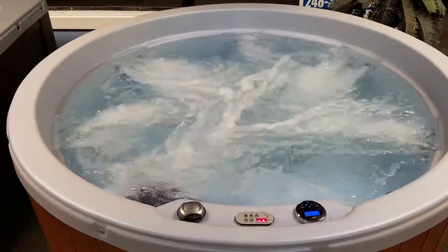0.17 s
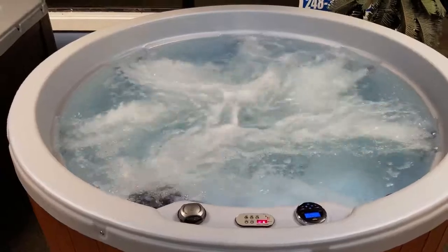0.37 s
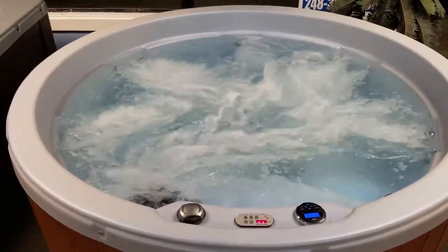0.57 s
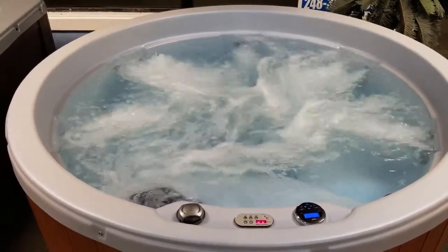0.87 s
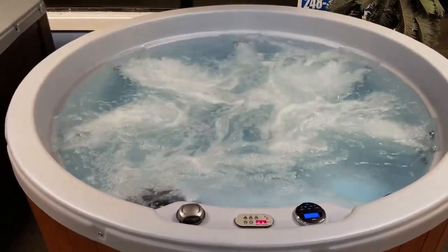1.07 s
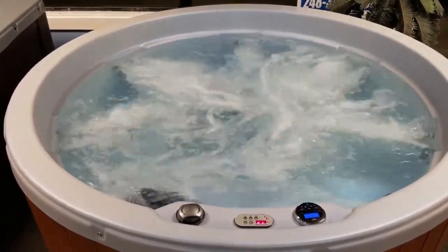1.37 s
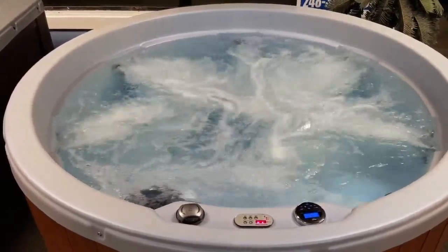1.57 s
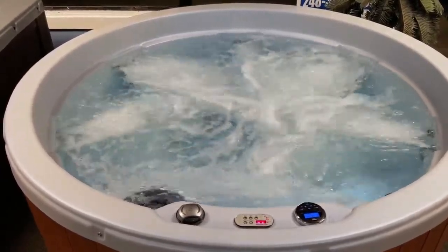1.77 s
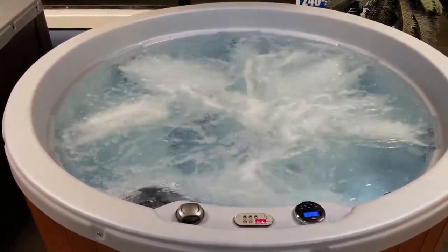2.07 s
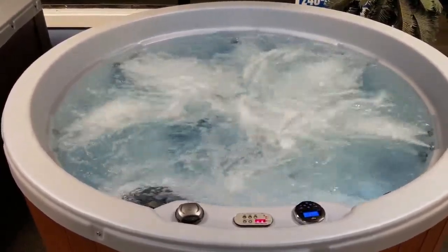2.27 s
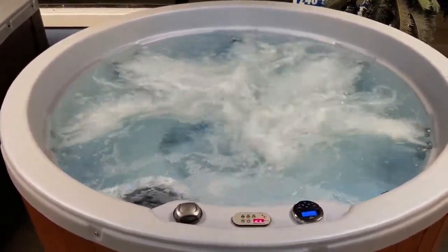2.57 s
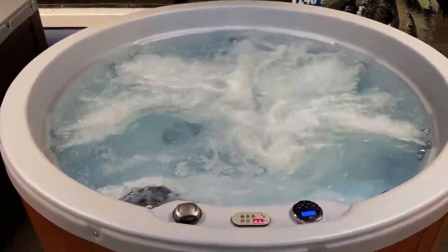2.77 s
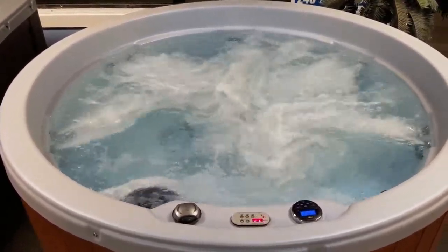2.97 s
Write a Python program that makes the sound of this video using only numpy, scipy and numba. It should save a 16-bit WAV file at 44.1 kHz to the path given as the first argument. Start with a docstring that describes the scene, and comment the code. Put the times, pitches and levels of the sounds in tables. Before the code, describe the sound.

Running hot tub rumbles and gurgles continuously, with fizzing spray and a faint pump hum

```python
"""Running hot tub, heard from the rim

A hot tub runs in a showroom, heard by a small two-port microphone; the sound fades in. Jets drive clouds of
large bubbles that drone in the shell: gliding sines blended with flickering noise. Froth and spray are made
the same way from smaller bubbles, and a few larger bubbles pop out of the wash. Air hisses into two intakes
as coloured noise with delayed copies off the tub walls, and the pump motor hums on wavering sines."""
import sys
import numpy as np
from scipy import signal
from scipy.fft import rfft, irfft
from scipy.io import wavfile
from scipy.ndimage import uniform_filter1d
from numba import njit

SR = 44100
rng = np.random.default_rng(int(sys.argv[2]) if len(sys.argv) > 2 else 0)


def wav_out(sig):
    """Save sig, one row per channel (or a flat mono array), as 16-bit PCM at SR to the path in sys.argv[1]."""
    wavfile.write(sys.argv[1], SR, np.round(np.clip(np.atleast_2d(sig).T, -1, 1) * 32767).astype(np.int16))


def gain_from_db(level_db):
    """Turn a decibel level (scalar or array-like) into a linear amplitude factor."""
    decades = np.asarray(level_db, float) / 20
    return 10 ** decades


N = 138033  # length in samples

HZ = np.arange(N // 2 + 1) * SR / N + 1e-3  # spectrum frequencies, kept above zero for the logarithm
BANDS = 40 * 2 ** np.arange(0, 9.5, .5)  # centres of the half-octave noise bands, Hz


def gain(table, col=1):
    """Gain at each spectrum frequency, drawn through (Hz, dB) points on a log frequency axis."""
    points = np.array(table, float)
    return gain_from_db(np.interp(np.log(HZ), np.log(points[:, 0]), points[:, col]))


def unit(x):
    """Scale to rms 1."""
    return x / np.sqrt(np.mean(x ** 2))


def curve(table):
    """Gain over time, drawn through (s, dB) points."""
    points = np.array(table, float)
    return gain_from_db(np.interp(np.arange(N) / SR, points[:, 0], points[:, 1]))


def walk(rate):
    """Slow random drift: levels held for 1 / rate seconds, smoothed twice; spread near 1."""
    hold = int(SR / rate)
    steps = np.repeat(rng.standard_normal(N // hold + 1), hold)
    smooth = uniform_filter1d(uniform_filter1d(steps, hold), hold)
    return smooth[:N] * 4 / 3  # makes up for the spread lost in smoothing


@njit
def ring(start, hz, cycles, left, right, lag, glide, rise, n):
    """Each bubble is a swelling, dying sine that rises in pitch; it sounds lag samples later on the right."""
    lead = 100  # spare samples ahead, for negative lags
    out = np.zeros((2, n + 8000))
    for k in range(len(start)):
        span = min(int(cycles[k] * SR / hz[k]), 7000)
        phase = 0.
        first = int(start[k]) + lead
        for i in range(span):
            phase += 2 * np.pi * hz[k] * (1 + glide * i / span) / SR
            swell = min(1., i / (rise * span))
            v = np.sin(phase) * np.exp(-5. * i / span) * swell
            out[0, first + i] += left[k] * v
            out[1, first + i + int(lag[k])] += right[k] * v
    return out[:, lead:n + lead]


def swarm(per_s, lo_hz, hi_hz, cycles, spread_db, lag_ms, glide, bunch_db):
    """Random bubbles all over the tub, in bunches; mean spectrum flat at the level of unit noise."""
    largest_db, rise = 9, .08  # cap on the random level; swell as a share of the bubble's life
    when, pitch, strength, side = rng.random((int(per_s * N / SR), 4)).T
    hz = lo_hz * (hi_hz / lo_hz) ** pitch
    start = when * (N - 1)
    level_db = np.minimum(-spread_db * np.log(strength + 1e-9), largest_db)
    bunch = bunch_db * walk(9.1)[start.astype(int)]
    size = hz * gain_from_db(level_db + bunch)  # the factor hz evens out the spectrum
    lag = (2 * side - 1) * lag_ms * SR / 1000
    bubbles = ring(start, hz, cycles + 0 * hz, size, size, lag, glide, rise, N)
    return unit(bubbles) * np.sqrt(2 * (hi_hz - lo_hz) / SR)


def spread(flicker_db, rate, bands):
    """Noise in half-octave bands that flicker independently; nearly alike left and right in the bass only."""
    side_db, alike_hz = -20.5, 1500  # side level in the bass; side grows to full near this frequency
    out = 0
    side = np.clip(gain_from_db(side_db) + (HZ / alike_hz) ** 2, 0, 1)
    for hz in bands:
        band = np.cos(np.pi * np.clip(np.log2(HZ / hz), -.5, .5))
        noise = np.exp(2j * np.pi * rng.random((2, len(HZ))))  # random phases
        m, s = noise * band / np.sqrt(1 + side ** 2)
        stereo = irfft(np.array([m + side * s, m - side * s]), N)
        out = out + gain_from_db(flicker_db * walk(rate)) * stereo
    return out * np.sqrt(N)


def mix(noise, grains, share, table):
    """Blend noise and bubbles by their share of the power, colour them and scale to rms 1."""
    blend = np.sqrt(1 - share) * noise + np.sqrt(share) * grains
    return unit(irfft(rfft(blend) * gain(table), N))


def pump():
    """Mains-driven hum of the motor: a few sines that waver in level and phase."""
    # Each row: frequency in Hz, rms level in dB, wander of the level in dB.
    hum_lines = [(120, -41.5, 1.2), (240, -52, 2.), (1320, -65, 2.)]
    waver = .5  # radians
    t = np.arange(N) / SR
    out = 0
    for hz, db, wander_db in hum_lines:
        level = np.sqrt(2) * gain_from_db(db + wander_db * walk(7.92))
        phase = 2 * np.pi * (hz * t + rng.random()) + waver * walk(9.13)
        out = out + level * np.sin(phase)
    return out


def spray():
    """Countless droplets, as very short high sines, fizz over an even treble rush."""
    # Colour of the fine spray all around. Each row: frequency in Hz, relative level in dB per Hz.
    spray_colour = [(1500, -20), (2500, 0), (3400, -1.5), (4000, 0), (5000, -1), (5400, -4), (6400, -5),
                    (7000, -8), (8000, -5), (9200, -4), (9450, -13), (10050, -13), (10250, -3), (11200, -4),
                    (11700, -8), (13300, -8), (14000, -2), (16000, -3)]
    drops = swarm(per_s=5000, lo_hz=2200, hi_hz=5500, cycles=3.9, spread_db=2.5, lag_ms=.36,
                  glide=.2, bunch_db=2.5)
    rush = spread(flicker_db=0.91, rate=9.96, bands=BANDS[9:])
    return mix(rush, drops, 0.19, spray_colour) * gain_from_db(-38)


def hiss():
    """Air sucked into two intakes: flickering noise, heard directly and as delayed copies off the tub walls."""
    # Colours of the duller and the brighter intake. Each row: frequency in Hz, relative level in dB per Hz.
    dull_colour = [(4000, -30), (5200, -7), (5800, -1), (6400, -4), (6900, 0), (7400, -1), (9200, -4),
                   (9500, -25)]
    bright_colour = [(9000, -25), (9400, -1), (10050, 0), (10250, -7), (11100, -7), (11600, 0), (13300, 0),
                     (13900, -8), (15000, -25)]
    # Paths from each intake. Each row: left delay in ms, left gain as a factor, right delay in ms,
    # right gain as a factor; a minus sign turns the wave over.
    dull_paths = [(0., 1., -.045, 1.), (1.156, .2, 1.115, .3), (3.064, .4, 2.283, .25),
                  (4.212, .2, 3.751, .55), (5.828, .2, 4.855, .2)]
    bright_paths = [(0., 1., .153, 1.), (1.13, .3, 1.281, .3), (3.974, .4, 2.965, .25),
                    (4.368, .3, 4.167, -.4), (5.45, -.25, 4.47, .25)]

    def late(ms):
        """A delay, as a phase turn of the spectrum."""
        return np.exp(-2j * np.pi * HZ * ms / 1000)

    out = 0
    for colour, paths in ((dull_colour, dull_paths), (bright_colour, bright_paths)):
        air = rfft(rng.standard_normal(N) * gain_from_db(.5 * walk(14))) * gain(colour)
        for left_ms, left, right_ms, right in paths:
            out = out + air * np.array([left * late(left_ms), right * late(right_ms)])
    return unit(irfft(out, N)) * gain_from_db(-41.5)


def froth():
    """Small bubbles burst all over the surface, as short gliding sines above a wash of water noise."""
    # Colour of the surface froth. Each row: frequency in Hz, relative level in dB per Hz.
    froth_colour = [(300, -42), (550, -12), (1000, -6), (1130, -3), (1500, -3), (1950, 1.5), (2070, 4.5),
                    (2200, 0), (3000, -9.5), (5000, -57)]
    # Rise and fall of the froth. Each row: time in seconds, level in dB.
    froth_level = [(.4, -44), (.7, -42), (1., -41.5), (1.25, -44), (1.45, -39), (1.65, -43.5), (2.42, -44),
                   (2.48, -38), (2.52, -43), (2.65, -40.5), (2.8, -42.5), (3.1, -41)]
    bubbles = swarm(per_s=1800, lo_hz=658, hi_hz=3990, cycles=13.2, spread_db=2.5, lag_ms=0.37,
                    glide=0.19, bunch_db=0.67)
    wash = spread(flicker_db=0.52, rate=11.0, bands=BANDS[5:16])
    return mix(wash, bubbles, 0.5, froth_colour) * curve(froth_level)


def pops():
    """A few larger bubbles stand out, most off to one side; each rings as a rising, dying sine."""
    # Each row: start in seconds, level in dB ahead of swell and decay, starting pitch in Hz,
    # left over right in dB.
    pop_list = [(0.47, -23, 920, 3), (0.693, -26, 1300, -5), (1.437, -28, 1500, -3), (1.46, -33, 1900, -2),
                (1.54, -24, 1700, -9), (2.44, -38, 2100, -12), (2.471, -25, 1990, -4),
                (2.486, -33, 1960, -1), (2.497, -35, 1300, 3), (2.537, -24, 1310, -10),
                (2.555, -22.5, 1200, 1), (2.575, -35, 2300, 0), (2.608, -25, 1300, -7),
                (2.621, -13, 1020, 1), (2.6255, -20, 1420, 0), (2.636, -35, 2700, 0), (2.66, -31, 1390, -6),
                (2.68, -39, 2050, 3), (2.712, -30, 1350, 2), (2.724, -23, 1350, -4)]
    cycles, lag_ms = 11., .27  # life in cycles of the starting pitch; delay on the right
    t, db, hz, pan = np.array(pop_list, float).T
    left, right = gain_from_db(db + pan / 2), gain_from_db(db - pan / 2)
    lag = lag_ms * SR / 1000 + 0 * t
    return ring(t * SR, hz, cycles + 0 * t, left, right, lag, .4, .2, N)  # glide, swell share of life


def churn():
    """Large bubble clouds from the jets drone in the tub shell: low gliding sines in flickering noise."""
    # Colour of the clouds through the shell. Each row: frequency in Hz, relative level in dB per Hz.
    churn_colour = [(30, -48), (44, -29), (57, -22), (75, -20), (92, -15.5), (110, -18), (150, -14.5),
                    (200, -7.5), (240, -4), (265, -4), (278, -1), (295, -3.5), (310, -6.5), (330, -6),
                    (390, -6), (408, -10), (428, -7), (468, -11), (495, -9), (600, -14.5), (645, -17.5),
                    (668, -16), (690, -18), (1000, -20.5), (1600, -23.5)]
    # Level of the churn. Each row: time in seconds, level in dB.
    churn_level = [(0.4, -32), (0.45, -32.5), (2.29, -31), (2.44, -33.5), (2.5, -31), (2.91, -31.5),
                   (2.96, -35.5), (3.0, -29.5), (3.1, -32)]
    clouds = swarm(per_s=1200, lo_hz=62.0, hi_hz=1387, cycles=5.1, spread_db=2.6, lag_ms=0.14,
                   glide=0.24, bunch_db=0.66)
    rumble = spread(flicker_db=0.72, rate=12.06, bands=BANDS[:12])
    return mix(rumble, clouds, 0.23, churn_colour) * curve(churn_level)


def echoes(x):
    """Direct sound plus a short dying scatter off rim and room, different at each port."""
    echo_db, t60_s = -7, .08  # scatter against direct sound; time to die by 60 dB
    t = np.arange(int(t60_s * SR)) / SR
    tail = rng.standard_normal((2, len(t))) * gain_from_db(-60 * t / t60_s)
    tail = gain_from_db(echo_db) * unit(tail) / np.sqrt(len(t))
    wet = irfft(rfft(x) * (1 + rfft(tail, N)), N)
    return wet / np.sqrt(1 + gain_from_db(echo_db) ** 2)


def scene():
    """All sources at the rim; the churn and the hum stay free of echoes."""
    surface = spray() + hiss() + pops() + froth()
    return pump() + echoes(surface) + churn()


def low_pass(x):
    """Removes everything above the highest recorded frequency."""
    return signal.sosfilt(signal.butter(12, 17070, fs=SR, output="sos"), x)


def record(dry):
    """The microphone ports colour the sound, the recorder passes a limited band, and the level fades in."""
    # Colour of the two microphone ports. Each row: frequency in Hz, left gain in dB, right gain in dB.
    port_colour = [(1000, 0, 0), (2000, -2, 1.5), (2500, 0, 1), (3400, -1, 0), (4400, -1, -1), (4900, 1, 0),
                   (5200, -3, -2), (6050, 0, 8), (6450, -2, 2), (6850, 1, 6), (7800, 1, 6), (8300, -3, 2),
                   (9250, -1, 1), (9480, -8.5, -8.5), (10050, -6, -7), (10300, -2, -6), (10600, -1, -7),
                   (11200, -2, -8), (11600, 4, -4.5), (13200, 2, -3), (13600, -2, -2), (14300, -3, -2),
                   (15000, -1, 3), (15400, -2, 1)]
    # Band that the recorder passes. Each row: frequency in Hz, gain in dB.
    pass_band = [(20, -25), (50, 0), (15740, 0), (15810, -35), (15900, -35), (16000, -70)]
    fade_start_s, fade_s, fade_power, fade_from_db = .091, .25, .7, -20
    ports = np.array([gain(port_colour, col=1), gain(port_colour, col=2)])
    heard = irfft(rfft(dry) * gain(pass_band) * ports, N)
    rise = np.clip((np.arange(N) / SR - fade_start_s) / fade_s, 0, 1) ** fade_power
    fade = (rise > 0) * (gain_from_db(fade_from_db) * (1 - rise) + rise)  # silent until the fade starts
    return low_pass(heard * fade)


dry = scene()
out = record(dry)
wav_out(out)
```